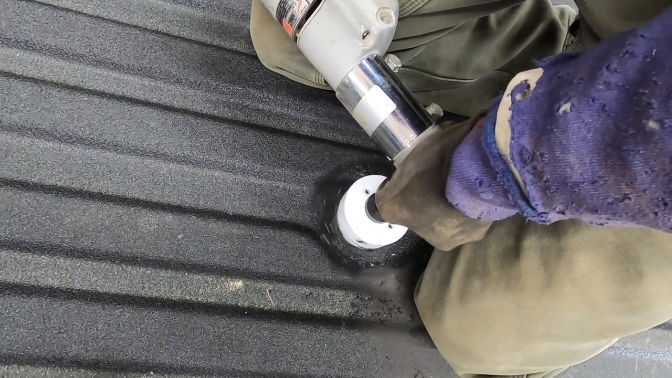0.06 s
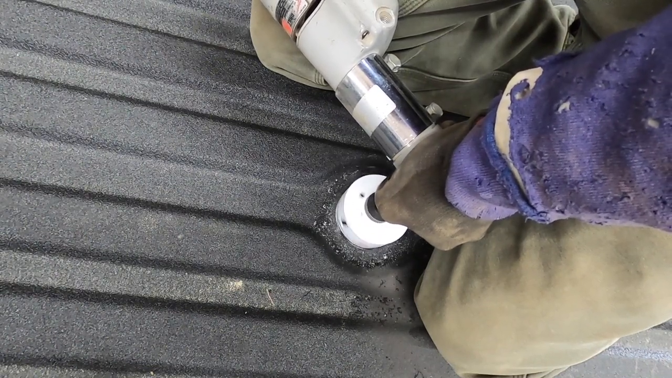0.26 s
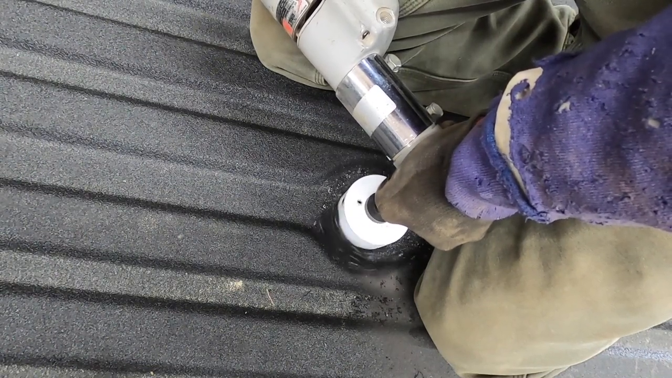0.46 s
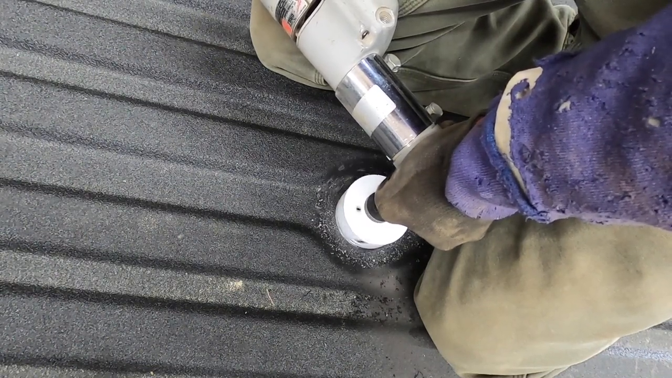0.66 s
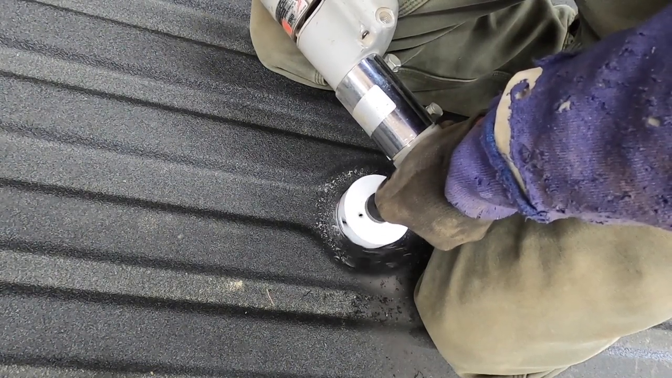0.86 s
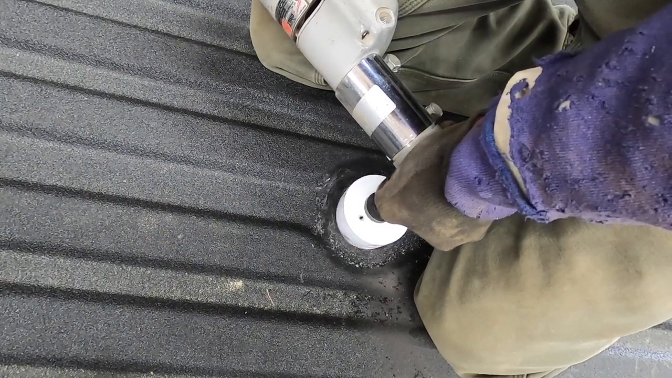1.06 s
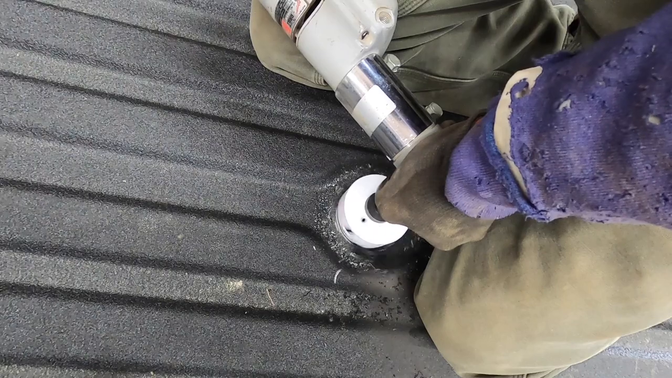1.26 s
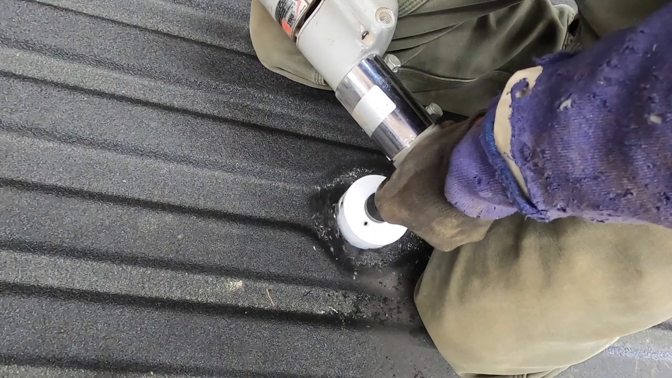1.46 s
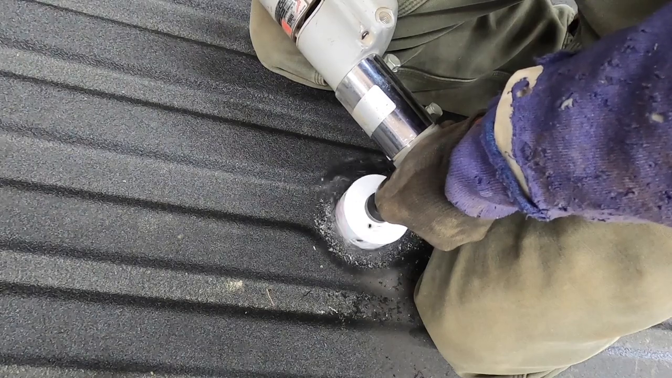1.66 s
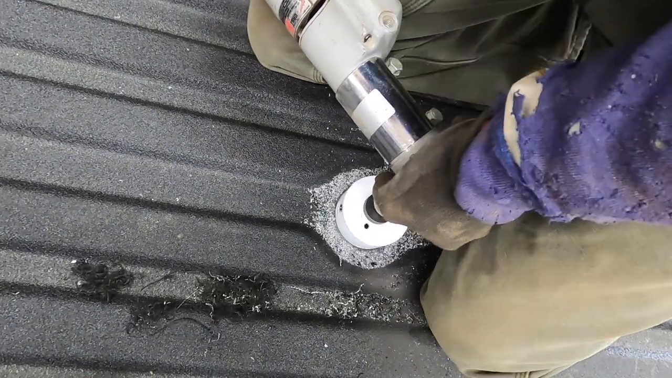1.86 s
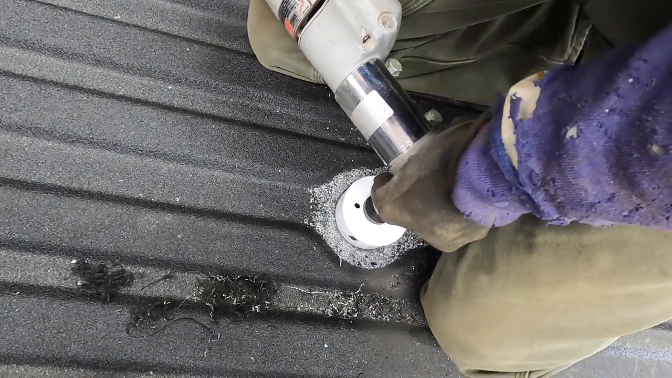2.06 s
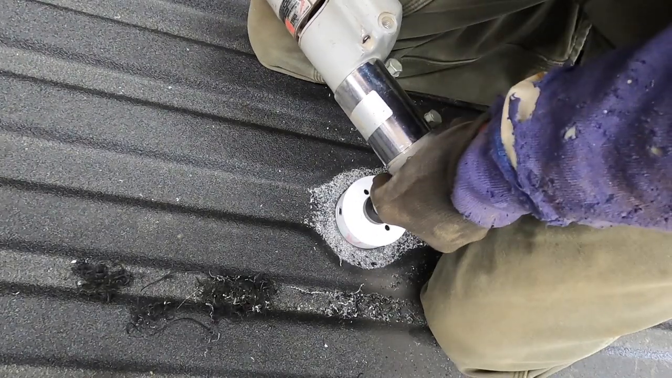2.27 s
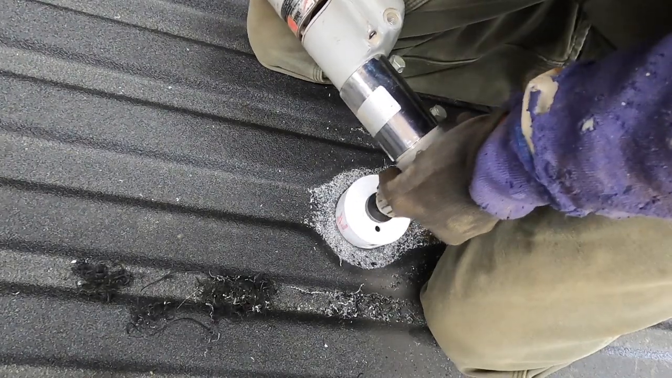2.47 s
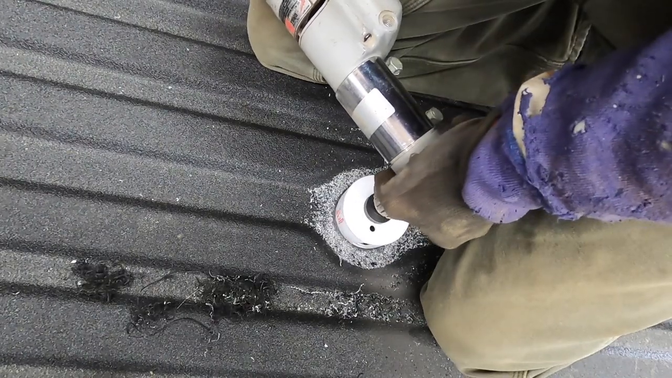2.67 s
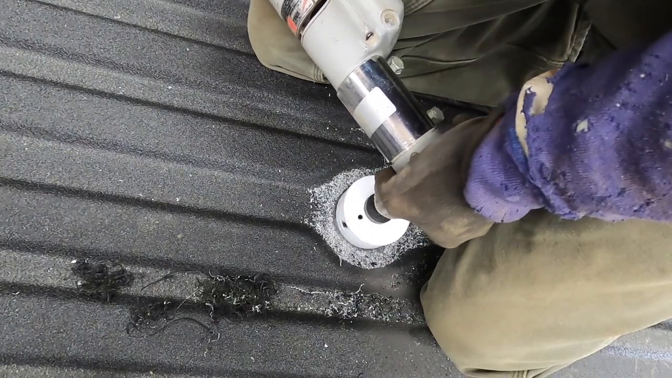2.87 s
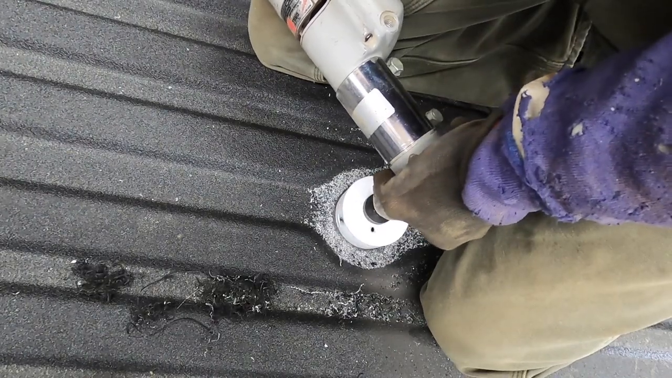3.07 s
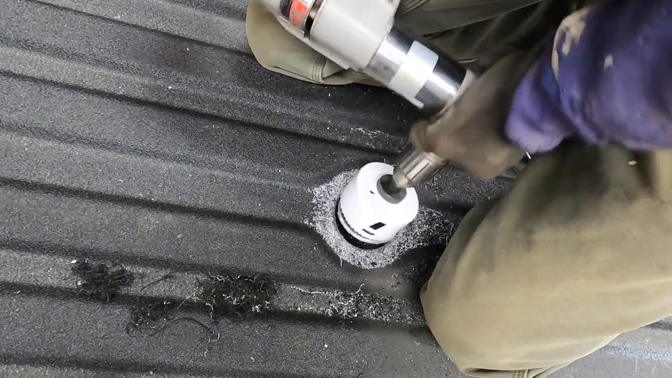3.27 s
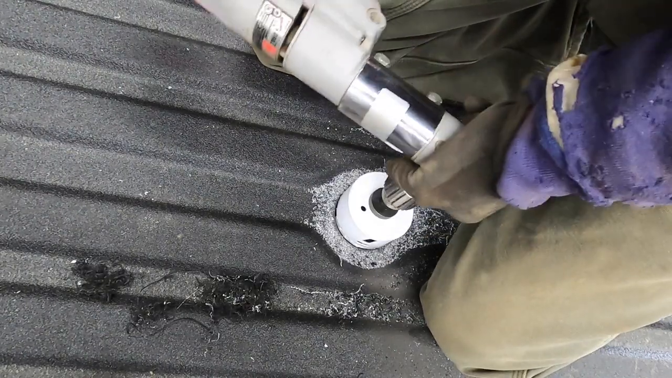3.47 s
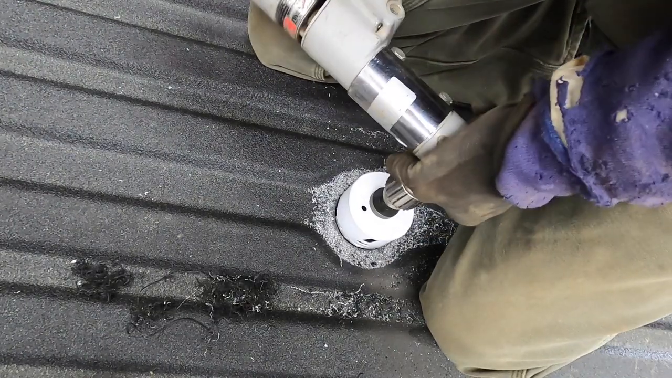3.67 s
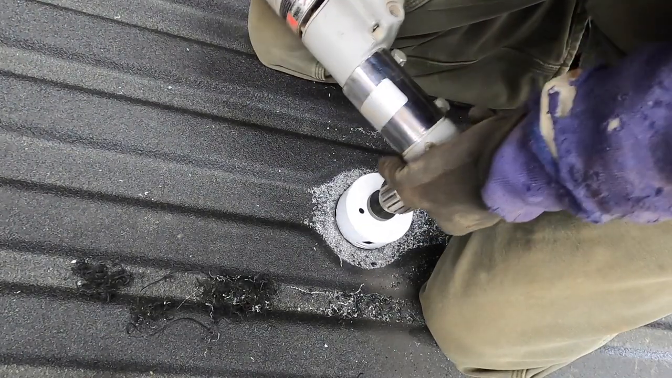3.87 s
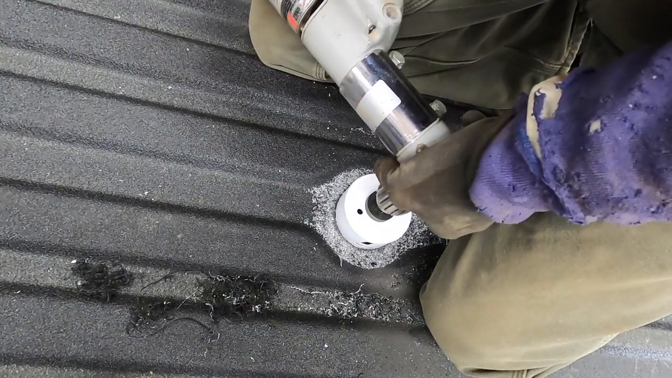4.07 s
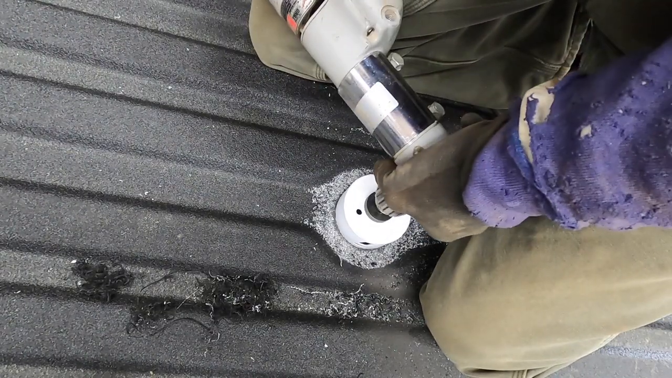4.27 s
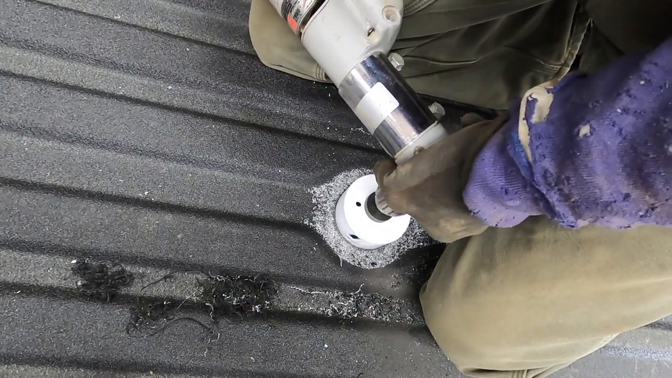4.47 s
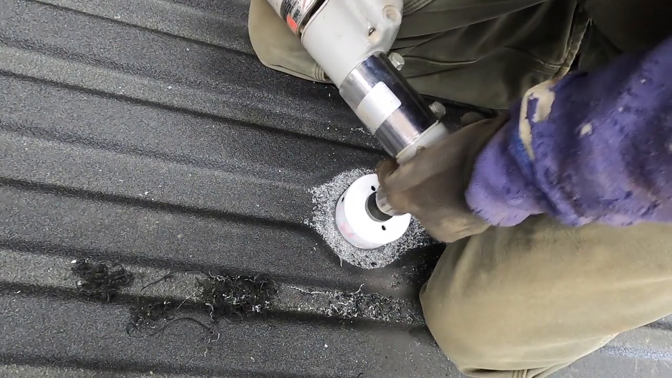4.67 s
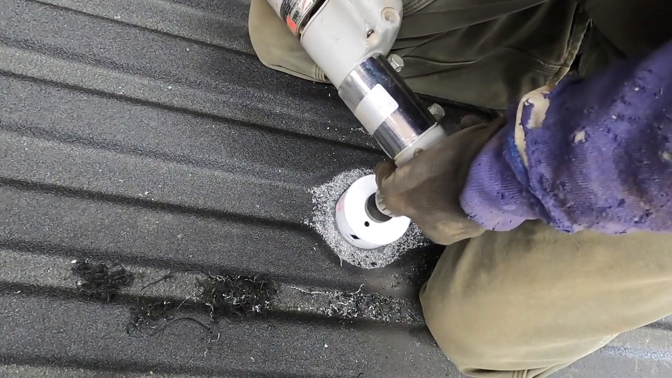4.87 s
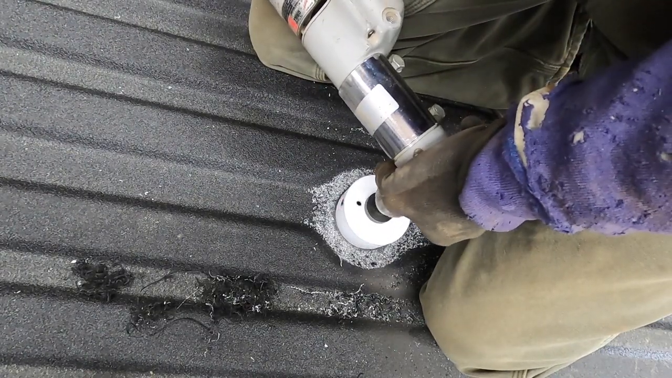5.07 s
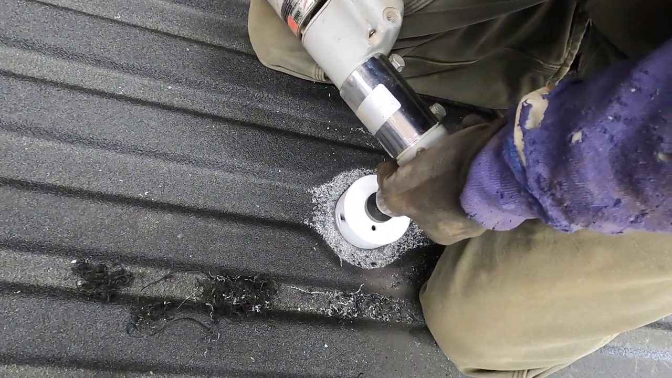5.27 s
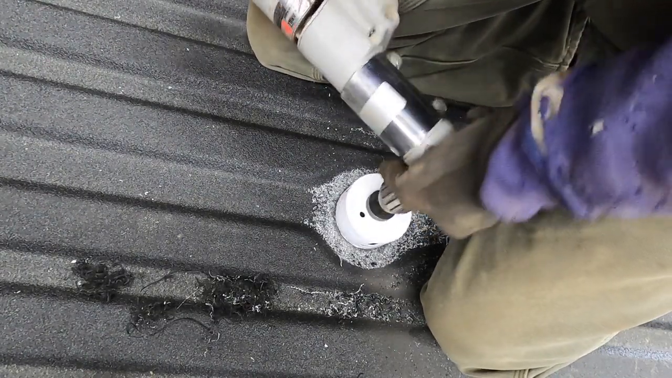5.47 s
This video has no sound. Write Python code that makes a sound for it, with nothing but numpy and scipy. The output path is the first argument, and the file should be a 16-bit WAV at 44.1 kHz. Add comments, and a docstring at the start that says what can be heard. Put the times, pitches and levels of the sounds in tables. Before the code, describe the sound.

A heavy drill whines around two kilohertz while saw teeth scrape steel, with hissing chips and a droning floor. After under two seconds it suddenly changes to a falling whine and jolting snags. Rough restarts follow, separated by a brief lull, with hard metal clacks and hollow booms. Close stereo pickup in open air, short clangy reflections from the steel bed.

```python
"""Hole saw in a steel truck bed floor

A mains drill turns a hole saw in ribbed steel, close by. The scene changes abruptly from the steady cut with
gear whine to the motor winding down from a higher speed; rougher bursts of changing speed follow, with snags,
floor boom and sharp clacks of the cup on its groove rim. One shaft phase drives whine, overtones and tooth
pulses; shaped noise makes scrape, chips and boom; decaying modes make the knocks."""
import sys
import numpy as np
from scipy import signal
from scipy.fft import rfft, irfft, next_fast_len
from scipy.io import wavfile
from scipy.ndimage import uniform_filter1d, map_coordinates

SR = 44100
rng = np.random.default_rng(int(sys.argv[2]) if len(sys.argv) > 2 else 0)


def digitize_waveform(pressure):
    """Quantize a signal to 16-bit integers and store it at the path in sys.argv[1].

    Rows of a 2-D input are taken as channels; values are limited to [-1, 1].
    """
    field = np.atleast_2d(pressure).T
    bounded = np.clip(field, -1, 1)
    quanta = np.round(bounded * 32767).astype(np.int16)
    wavfile.write(sys.argv[1], SR, quanta)


N = 243873

MAINS_HZ = 60
TURNS_PER_TOOTH = 10.25  # motor turns per tooth pulse
STEADY_END_S = 1.78
FULL_SPEED_HZ, STALL_SPEED_HZ = 500, 66  # motor turns: reference for levels; below stall the cut dies away
HISS_SLOPE_DB = 30  # per decade of pace; also for overtones and case ring
# colour of teeth scraping steel: (frequency [Hz], relative level [dB])
SCRAPE_COLOUR = [(250, -34), (400, 1), (540, -6), (700, 1.5), (860, -1), (1020, 3.5), (1230, 0.5),
                 (1450, -2), (1800, -1), (2400, -4.5), (3200, -8.5), (6000, -58)]


def amp(db):
    """Decibels to gain."""
    return 10 ** (np.asarray(db) / 20)


def unit(x):
    """Scale to rms 1."""
    return x / np.sqrt(np.mean(x ** 2) + 1e-20)


def along(points, hz):
    """Read (Hz, value) points on a log frequency axis."""
    f, v = np.transpose(points)
    return np.interp(np.log(hz + 1), np.log(f + 1), v)


def curves(rows):
    """Interpolate each column after the time to one value per sample."""
    s, *cols = np.transpose(rows)
    return [np.interp(np.arange(N) / SR, s, c) for c in cols]


def wobble(rate_hz):
    """Smooth random curve with rate_hz knots a second."""
    knots = rng.standard_normal(int(N * rate_hz / SR) + 4)
    return map_coordinates(knots, [np.arange(N) * rate_hz / SR])


def phase(hz):
    """Running angle of a rotation [rad]."""
    return 2 * np.pi * np.cumsum(hz * np.ones(N)) / SR


def filtered(x, response):
    """Apply a complex frequency response."""
    m = next_fast_len(N + SR // 2)
    return irfft(rfft(x, m) * response(np.fft.rfftfreq(m, 1 / SR)), m)[..., :N]


def coloured(x, spectrum):
    """Shape by a spectrum, then scale to rms 1."""
    return unit(filtered(x, lambda hz: amp(along(spectrum, hz))))


def fade(t, t60_s):
    """Exponential decay by 60 dB in t60_s."""
    return np.exp(-np.log(1000) * t / t60_s)


def swell(centre_s, half_s):
    """Gaussian rise and fall, down to 1/e at half_s from the centre."""
    return np.exp(-((np.arange(N) / SR - centre_s) / half_s) ** 2)


def swells(rows):
    """Power sum of swells given as (centre s, half length s, dB)."""
    return sum((amp(db) * swell(s, half_s)) ** 2 for s, half_s, db in rows)


def add(track, s, sound):
    """Mix a sound in at time s."""
    part = track[..., round(s * SR):][..., :sound.shape[-1]]
    part += sound[..., :part.shape[-1]]


def pace(speed_hz):
    """Speed above stall, in decades relative to full speed."""
    return np.log10(np.maximum(speed_hz - STALL_SPEED_HZ, 1) / (FULL_SPEED_HZ - STALL_SPEED_HZ))


def outdoor_air():
    """Faint outdoor air: stationary shaped noise."""
    # air colour: (frequency [Hz], relative level [dB])
    air_colour = [(25, -21), (60, 24), (100, -5), (150, 12.5), (240, 4.5), (330, -6.5), (550, -14),
                  (1000, -21), (1260, -6), (1600, -15.5), (4000, -20), (9000, -35.5), (15000, -55)]
    return amp(-44.0) * coloured(rng.standard_normal((2, N)), air_colour)


def bed_echo(x):
    """Steel bed walls answer with a short noise tail whose decay time depends on frequency."""
    # wall echoes: (frequency [Hz], t60 [s])
    wall_decay = [(150, 0.59), (1500, 0.14), (6000, 0.097), (12000, 0.12)]
    hz, t, z = signal.stft(rng.standard_normal((2, SR // 3)), SR, nperseg=256)
    decay = fade(t, along(wall_decay, hz)[:, None])
    tail = signal.istft(z * decay, SR, nperseg=256)[1]
    return signal.fftconvolve(x, tail / np.linalg.norm(tail[0]), axes=1)[:, :N]


def spread(pair):
    """Mix two unrelated signals to left and right, alike in the bass and apart in the treble."""
    # left-right likeness: (frequency [Hz], correlation [-])
    likeness = [(300, .993), (500, .88), (1000, .8), (2200, .55), (5000, .3), (8000, 0)]

    def mid_side_gains(hz):
        turn = np.arccos(np.clip(along(likeness, hz), -1, 1)) / 2
        return np.array([np.cos(turn), np.sin(turn)])

    mid, side = filtered(pair, mid_side_gains)
    return np.array([mid + side, mid - side])


def chips():
    """Flying steel chips land with a dry noise tick and a tiny high ping."""
    # chip landings: (time [s], crack level [dB], ping level [dB])
    landings = [(3.291, -24, -36), (3.533, -42, -37), (3.8812, -50, -55), (3.948, -45.5, -38.5),
                (4.777, -40, -40), (5.327, -31, -38)]
    # tick colour: (frequency [Hz], relative level [dB])
    tick_colour = [(2000, -9), (6000, 0), (9000, -2), (13000, 1), (15500, -14)]
    t = np.arange(SR // 20) / SR
    decay = fade(t, .016)
    cracks, pings = np.zeros(N), np.zeros(N)
    for s, crack_db, ping_db in landings:
        add(cracks, s, amp(crack_db) * decay)
        add(pings, s, amp(ping_db) * decay)
    ping = np.sin(phase(12300 + 450 * wobble(1500)))
    return cracks * coloured(rng.standard_normal((2, N)), tick_colour) + pings * ping


def panel(force):
    """Low floor modes answer a force as resonant bandpasses of alternating sign."""
    # floor modes: (frequency [Hz], width [Hz], level [dB])
    floor_modes = [(56.6, 25.5, -6.5), (88, 36.5, -5.5), (117, 20, -2), (153.7, 13.2, 1.5),
                   (181.3, 12.7, -8.5), (209.7, 8.8, 0.5), (264.2, 26.8, -0.5), (286.4, 19.7, 3),
                   (320.4, 37, -8), (345.6, 25.8, -5.5), (400, 29, -13)]

    def response(f):
        total = 0
        for k, (centre, width, db) in enumerate(floor_modes):
            damping = 1j * f * width
            total = total + (-1) ** k * amp(db) * damping / (centre ** 2 - f ** 2 + damping)
        return total

    return filtered(force, response)


def ring(modes, t):
    """A blow excites decaying modes with new random strengths and phases in each of two channels."""
    total = 0
    for hz, db, t60_s in modes:
        strength = amp(db + rng.normal(0, 2.2, (2, 1)))
        start_turns = rng.random((2, 1))
        total = total + strength * fade(t, t60_s) * np.sin(2 * np.pi * (hz * t + start_turns))
    return total


def knocks():
    """The cup clacks on its groove rim and rattles; snagging teeth tear steel and jolt the floor."""
    # rim strikes: (time [s], level [dB], thud re level [dB], cup ring re level [dB])
    clacks = [(2.275, -20, 12, -11), (2.768, -33, -2, -1), (2.779, -47, -4, -4), (3.287, -12, -15, -10),
              (3.335, -11, -10, 2), (3.39, -15, 7, 1), (3.404, -16, 13, 1), (3.52, -22.5, 7, 0),
              (3.576, -30, -3, -8), (4.015, -38, 2, 0), (4.0933, -11.5, -4, -8), (4.143, -15, -10, -4),
              (4.256, -29, 8, -8), (4.269, -30, 12, -5), (4.301, -23.5, 8.5, 0), (4.3353, -28, 6, 2),
              (4.468, -29, 0, -6), (4.4742, -13, -8, -3.5), (5.3171, -11, 4, -8), (5.327, -17, -11, -4),
              (5.3893, -6, -8, -14), (5.431, -11, -7, -11), (5.476, -19, -3, -10)]
    # tooth snags: (time [s], thud level [dB], clank level [dB])
    snags = [(1.865, -2, -21), (1.97, -9, -26), (2.136, -26, -21), (2.5825, -10, -23), (2.657, -5, -21),
             (3.278, 0, -33), (3.354, -4, -13), (3.394, -1, -19), (4.577, -2.5, -22), (4.652, -2, -31),
             (4.71, -5, -18), (4.757, -7, -22)]
    # light rattles of the handled cup: (time [s], level [dB])
    rattles = [(3.831, -46), (3.899, -54), (4.05, -46), (4.227, -42), (4.245, -38), (4.532, -25),
               (4.653, -23), (5.07, -23.5), (5.478, -16.5), (5.522, -22)]
    # saw cup modes: (frequency [Hz], level [dB], t60 [s])
    cup_modes = [(1240, -9.5, 0.051), (1820, -7, 0.025), (2010, -18, 0.043), (2450, -30, 0.027),
                 (3140, -16, 0.032), (3460, -17, 0.015), (4000, -22, 0.0065), (4580, -6, 0.012),
                 (5010, -21, 0.016), (6090, -20, 0.025), (6760, -25, 0.025)]
    # clank modes of a snag: (frequency [Hz], level [dB], t60 [s])
    jolt_modes = [(543, -5.5, 0.033), (780, -15, 0.017), (872, -4, 0.048), (1024, -9, 0.038),
                  (1167, -4.5, 0.058), (1270, -5, 0.017), (1640, -9, 0.038)]
    # floor modes under light taps: (frequency [Hz], level [dB], t60 [s])
    tap_modes = [(910, 5, 0.018), (1215, -5, 0.03), (1282, 7.5, 0.05), (1560, -4.5, 0.026),
                 (1770, 1, 0.018), (3240, -23, 0.035)]
    # contact crack colour: (frequency [Hz], relative level [dB])
    crack_colour = [(300, -16), (1200, 9.5), (2500, 7), (4500, 6.5), (7000, -2), (10000, -8), (15000, -27)]
    steel, force = np.zeros((2, N)), np.zeros(N)
    cracks, crunches = np.zeros(N), np.zeros(N)
    t = np.arange(SR // 4) / SR
    crack = coloured(rng.standard_normal((2, N)), crack_colour)
    crunch = coloured(rng.standard_normal((2, N)), SCRAPE_COLOUR)
    push = fade(t, 0.0042) / fade(t, 0.0033).sum()
    seat = 1 - fade(t, .006)  # teeth land one after another
    for s, db, thud_db, cup_db in clacks:
        add(steel, s, amp(db + cup_db) * seat * ring(cup_modes, t))
        add(cracks, s, amp(db - 6.5) * seat * fade(t, 0.027))
        add(force, s, amp(db + thud_db + 35.0) * push)
    for s, thud_db, clank_db in snags:
        add(force, s, amp(thud_db + 36.5) * push)
        add(crunches, s, amp(thud_db - 27) * seat * fade(t, .06))
        add(steel, s, amp(clank_db) * seat * ring(jolt_modes, t))
    for s, db in rattles:
        add(steel, s, amp(db - 5.5) * seat * ring(tap_modes, t))
    return steel + cracks * crack + crunches * crunch, panel(force)


def trigger(ripple):
    """Chopped mains jerks the gears before the motor spins up: noise pulsed on each mains half wave."""
    # trigger buzz: (time [s], level [dB])
    buzz_levels = [(4.36, -100), (4.38, -46), (4.42, -46), (4.46, -49), (4.52, -90)]
    # buzz colour: (frequency [Hz], relative level [dB])
    buzz_colour = [(1200, -29), (2100, 7), (2600, -6), (3100, 4), (3600, -16), (5700, -18), (15000, -43)]
    buzz_db, = curves(buzz_levels)
    jerks = amp(8.3 * np.cos(ripple)) * rng.standard_normal((2, N))
    return amp(buzz_db) * coloured(jerks, buzz_colour)


def drive(steady):
    """Motor speed, layer levels (at full speed, except the whine), ripple swing and backlash smear.

    The first burst only winds down; the later ones rise and fall in speed, whine loudest at the top."""
    # speed in the bursts: (time [s], motor speed [turns/s])
    burst_speeds = [(1.78, 636), (1.83, 632), (1.9, 598), (1.97, 525), (2.08, 403), (2.15, 345),
                    (2.25, 292), (2.3, 287), (2.37, 305), (2.43, 305), (2.5, 275), (2.7, 127), (2.78, 92),
                    (2.86, 130), (2.95, 216), (3.09, 387), (3.15, 440), (3.2, 450), (3.27, 390),
                    (3.45, 165), (3.56, 88), (3.72, 35), (4.38, 30), (4.48, 105), (4.54, 240), (4.61, 455),
                    (4.68, 475), (4.8, 460), (4.86, 416), (4.92, 356), (4.97, 335), (5.02, 356),
                    (5.07, 408), (5.21, 517), (5.26, 572), (5.33, 583), (5.39, 592), (5.44, 545),
                    (5.53, 400)]
    # bursts: (start [s], boom [dB], scrape [dB], hiss [dB], whine at top speed [dB],
    # whine fall per decade of speed [dB], overtones [dB], case ring [dB], swing [rad], smear [rad])
    burst_settings = [(1.7, -22.5, -27.3, -31.3, -31, 35, -42, -35, 1.1, .8),
                      (2.27, -23, -30.5, -30.5, -38.5, 80, -38, -38, 1, 1),
                      (2.78, -20.5, -26.5, -25.8, -24.5, 105, -27.5, -27.5, .75, .62),
                      (4.1, -21.5, -29.3, -32.3, -36, 80, -45, -28.5, 1, .65),
                      (4.98, -24, -28.5, -32, -28, 50, -41, -29.5, 1.05, .6)]
    # speed in the steady cut: (time [s], motor speed [turns/s])
    feed_speeds = [(0, 489), (.12, 477), (.28, 488), (.42, 483), (.55, 474), (.69, 481), (.82, 476),
                   (1.14, 523), (1.24, 525), (1.44, 507), (1.64, 508), (1.78, 502)]
    # gear load in the steady cut: (time [s], whine [dB], ripple swing [rad])
    feed_loads = [(0, -21.5, 1), (.12, -25.5, 1.05), (.3, -23, .9), (.5, -24.5, 1.15), (.75, -24.5, 1.15),
                  (.95, -21.5, .9), (1.2, -22.5, 1.05), (1.4, -21.5, 1.1), (1.55, -21.5, 1.4),
                  (1.78, -21.3, 1.45)]
    blend_s, pull_accel = .08, 3100  # pull_accel in turns/s per s
    pull_hiss_db, pull_tones_db = 2, 5

    def smooth(x, s):
        return uniform_filter1d(x, int(s * SR), axis=-1)

    speed_hz = smooth(curves(burst_speeds)[0], blend_s / 2)
    start_s, *settings = np.transpose(burst_settings)
    burst = np.maximum(np.searchsorted(start_s, np.arange(N) / SR) - 1, 0)
    tops_hz = [speed_hz[burst == k].max() for k in range(len(start_s))]
    blended = smooth(np.array([tops_hz, *settings])[:, burst], blend_s)
    top_hz, boom_db, scrape_db, hiss_db, whine_db, fall_db, tones_db, ring_db, swing, smear = blended
    pull = np.tanh(np.gradient(speed_hz) * SR / pull_accel)  # towards 1 under power, -1 when coasting
    bursts = [speed_hz, boom_db, scrape_db, hiss_db + pull_hiss_db * pull,
              whine_db + fall_db * np.log10(speed_hz / top_hz),
              tones_db + pull_tones_db * pull, ring_db + pull_tones_db * pull / 2, swing, smear]
    feed_speed_hz, = curves(feed_speeds)
    feed_whine_db, feed_swing = curves(feed_loads)
    # same order as bursts
    feed = [feed_speed_hz, -28, -27.5, -27, feed_whine_db, -26.5, -26.5, feed_swing, .62]
    return [steady * even + (1 - steady) * rough for even, rough in zip(feed, bursts)]


def motor(shaft, ripple, steady, whine_db, tones_db, ring_db, swing, smear):
    """Gear whine swung by mains torque ripple, shaft overtones that flare at the case's ring, and hum."""
    # motor tones: (multiple of shaft rate [-], level in even feed [dB], level in uneven feed [dB])
    orders = [(2, -8.5, -7), (5, -10, -21), (6, -19, -5), (7, -8, -18), (8, -5, -2), (9, -17, -14),
              (10, -10, -1.5), (12, -9, -15)]
    # case response to the whine: (frequency [Hz], gain [dB])
    mesh_case = [(1780, 1.5), (1890, -.5), (1950, 2), (2060, -1.5), (2150, 2.5), (2220, -1.5), (2340, 1.5),
                 (2450, 3), (2600, -2)]
    # case response to the overtones: (frequency [Hz], gain [dB])
    gear_case = [(300, -33), (1000, 1), (1500, -2.5), (1800, 4), (2400, -1.5), (2650, -3), (3100, -3),
                 (3400, -10), (3830, 1), (4150, -8), (4450, -9.5), (4800, -18), (5070, -3), (5250, -10.5),
                 (5800, -3), (6150, -16), (6600, -18)]
    case_hz, case_width_hz = 3100, 170
    mesh = 4 * shaft
    torque = amp(.7 * wobble(40) + .6 * np.cos(shaft / TURNS_PER_TOOTH)) * (1 + .35 * np.cos(ripple))
    # backlash smears the overtones, and the whine a little
    whine_angle = mesh + swing * np.sin(ripple) + .15 * smear * wobble(100)
    whine = amp(whine_db) * torque * np.sin(whine_angle)
    waver = amp((2.2 - 1.2 * steady) * wobble(35))
    whine = waver * filtered(whine, lambda hz: amp(along(mesh_case, hz)))
    # tones flutter when the cup rocks
    flutter = amp(3 * (1 - steady) * (wobble(150) + .6 * wobble(35)))
    tones = np.zeros(N)
    for k, even_db, rough_db in orders:
        level_db = rough_db + steady * (even_db - rough_db) + 1.65 * wobble(14)
        tones += amp(level_db) * np.sin(k * shaft + smear * wobble(160))
    tones = torque * flutter * tones
    overtones = filtered(tones, lambda hz: amp(along(gear_case, hz)))
    flare = filtered(tones, lambda hz: 1 / (1 + ((hz - case_hz) / case_width_hz) ** 2))
    hum = amp(-34.5) * steady * np.sin(ripple)
    return whine + amp(tones_db) * overtones + amp(ring_db) * flare + hum


def grit(grain_db, grain_rate_hz):
    """Two noises broken into grains as chips tear off."""
    return rng.standard_normal((2, N)) * amp(grain_db * wobble(grain_rate_hz))


def cutting(shaft, ripple, steady, speed_hz, boom_db, scrape_db, hiss_db):
    """Teeth scrape steel, throw chips and shake the floor, louder with speed and when the cup leans."""
    # cup leans on its groove wall: (time [s], half length [s], boom level [dB], scrape level [dB])
    leans = [(2.022, 0.076, -19, -41), (2.58, 0.012, -15.5, -71), (2.678, 0.08, -17.5, -49.5),
             (3.003, 0.1, -19, -31), (3.277, 0.068, -16, -28.5), (3.342, 0.025, -12.5, -26),
             (3.406, 0.025, -15, -40), (3.573, 0.1, -34.5, -48), (4.034, 0.028, -42, -57.5),
             (4.141, 0.035, -32, -59), (4.27, 0.065, -29.5, -45), (4.38, 0.069, -42, -51.5),
             (4.642, 0.089, -18, -27.5), (5.518, 0.14, -16.5, -49)]
    # chatter outbreaks of the main floor mode: (time [s], half length [s], level [dB])
    outbreaks = [(0.069, 0.076, -15.5), (0.262, 0.051, -17.5), (0.37, 0.069, -14), (0.502, 0.052, -17),
                 (0.694, 0.071, -17), (0.829, 0.043, -15.5), (0.967, 0.063, -18), (1.127, 0.029, -18),
                 (1.26, 0.088, -13.5), (1.456, 0.059, -24), (1.657, 0.082, -15.5), (1.868, 0.026, -13.5),
                 (2.006, .03, -28), (2.169, 0.054, -12), (2.352, 0.097, -24), (2.675, 0.017, -11.5),
                 (2.829, 0.083, -22.5)]
    # feed rumble at full speed: (multiple of tooth rate [-], level [dB])
    tooth_tones = [(1, -32), (2, -35.5), (3, -34.5), (6, -35)]
    # chip hiss colour: (frequency [Hz], relative level [dB])
    hiss_colour = [(1200, -13), (2000, 4.5), (2600, -1.5), (3200, -3), (3900, -2), (4600, -4.5),
                   (5300, -8.5), (5900, -7.5), (7000, -14.5), (8300, -14.5), (9500, -22), (12300, -28),
                   (14000, -37.5), (15800, -67)]
    # rubbed cup colour: (frequency [Hz], relative level [dB])
    sing_colour = [(600, 8), (1050, -27), (1180, 10), (1270, 17.5), (1400, -18), (2200, -29), (9000, -70)]
    # soft push of a lean: (frequency [Hz], relative level [dB])
    lean_colour = [(70, -3), (115, -1.5), (160, 1.5), (240, -3), (400, -2.5)]
    boom_slope_db, scrape_slope_db, chatter_slope_db = 17.5, 15.5, 13.5  # per decade of pace
    fast = pace(speed_hz)
    rocking = 1 - steady
    lean_gain = np.sqrt(swells([(s, half_s, db) for s, half_s, db, _ in leans]))
    rub_gain = np.sqrt(swells([(s, half_s, db) for s, half_s, _, db in leans]))
    scrape_gain = np.hypot(amp(scrape_db + scrape_slope_db * fast), rub_gain)
    hiss_gain = np.hypot(amp(hiss_db + HISS_SLOPE_DB * fast), amp(-3) * rub_gain)

    # bite pulses with teeth and mains torque, more so when rocking at speed; chips follow the mains less
    tooth = shaft / TURNS_PER_TOOTH
    ripple_db = 1.2 + 1.4 * rocking * speed_hz / FULL_SPEED_HZ
    pulsing = amp(.7 * np.cos(tooth) + ripple_db * np.cos(ripple) - .4)
    spray = amp(.7 * np.cos(tooth) + .5 * np.cos(ripple) + .7 * rocking * wobble(110))
    bite = pulsing * amp(0.72 * rocking * wobble(110))
    scrape = scrape_gain * coloured(bite * grit(1.5, 900), SCRAPE_COLOUR)
    hiss = hiss_gain * coloured(spray * grit(0.7, 840), hiss_colour)
    # rocking in its groove, the cup rubs and sings
    sing = amp(-6.5) * scrape_gain * rocking * coloured(bite * grit(-4.0, 200), sing_colour)

    boom = amp(boom_db + boom_slope_db * fast) * unit(panel(bite * rng.standard_normal(N)))
    boom = boom + lean_gain * unit(panel(coloured(rng.standard_normal(N), lean_colour)))
    # self-sustained floor mode, purest when the feed is even
    base_gain = amp(-30 + chatter_slope_db * fast + 3.2 * wobble(14))
    chatter_gain = np.sqrt(base_gain ** 2 + swells(outbreaks))
    chatter_hz = 236 + (4.5 - 2.74 * steady) * wobble(35)
    chatter = chatter_gain * amp(0.42 * wobble(30)) * np.sqrt(2) * np.sin(phase(chatter_hz))
    # a faster saw shakes the floor harder
    feed_db = 0.074 * (speed_hz - FULL_SPEED_HZ)
    rumble = np.zeros(N)
    for k, db in tooth_tones:
        tone = np.sqrt(2) * np.sin(k * tooth + 0.11 * k * wobble(10.2))
        rumble += amp(db + feed_db + wobble(27.0)) * tone
    return scrape + hiss + sing + boom, chatter + steady * rumble


def scene():
    """One shaft drives motor and cut; knocks and chips join in, over faint outdoor air."""
    steady, = curves([(STEADY_END_S - .01, 1), (STEADY_END_S + 0.00604, 0)])
    speed_hz, boom_db, scrape_db, hiss_db, whine_db, tones_db, ring_db, swing, smear = drive(steady)
    shaft = phase(speed_hz * (1 + .0005 * wobble(25)))
    ripple = phase(2 * MAINS_HZ)
    grind, drone = cutting(shaft, ripple, steady, speed_hz, boom_db, scrape_db, hiss_db)
    speed_db = HISS_SLOPE_DB * pace(speed_hz)
    gears = motor(shaft, ripple, steady, whine_db, tones_db + speed_db, ring_db + speed_db, swing, smear)
    clacks, thuds = knocks()
    echo = amp(-3.5) * bed_echo(clacks)
    wide = spread(grind + trigger(ripple) + clacks + echo + outdoor_air())
    return wide + drone + thuds + gears + chips()


def record(dry):
    """Two microphones differ in colour and delay and keep nothing above the band limit."""
    # channel balance: (frequency [Hz], left minus right [dB])
    balance = [(240, -.2), (480, .8), (950, .8), (1900, 1.8), (3800, 1.3), (7500, -3), (14000, -7)]
    lag_samples, top_hz = .7, 15800  # left lags right
    sides = np.array([[.5], [-.5]])

    def response(hz):
        delay = np.exp(-2j * np.pi * sides * hz * lag_samples / SR)
        return amp(sides * along(balance, hz)) * delay * (hz < top_hz)

    return filtered(dry, response)


dry = scene()
out = record(dry)
digitize_waveform(out)
```